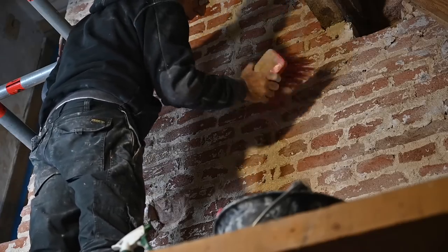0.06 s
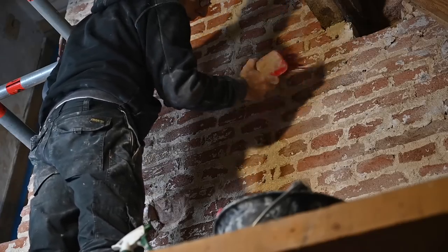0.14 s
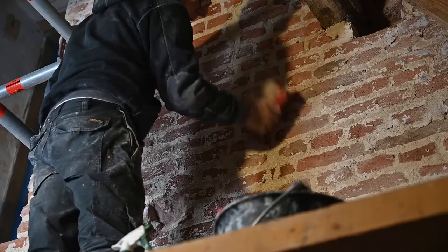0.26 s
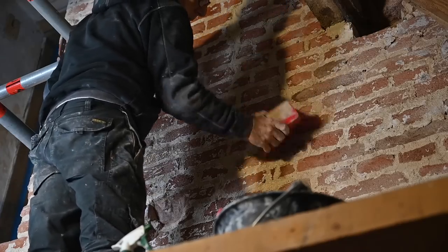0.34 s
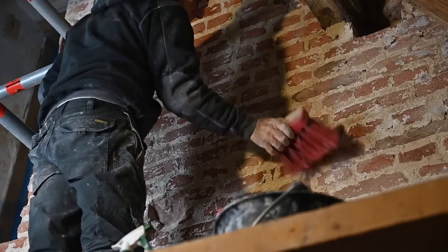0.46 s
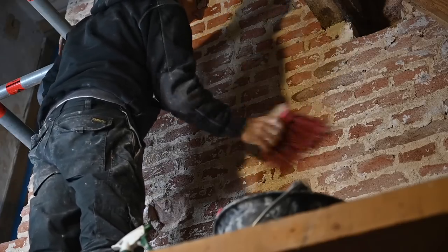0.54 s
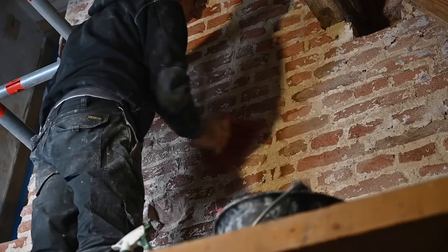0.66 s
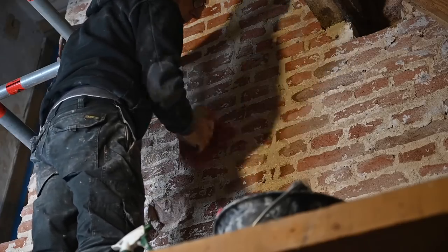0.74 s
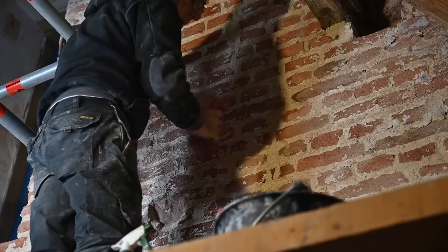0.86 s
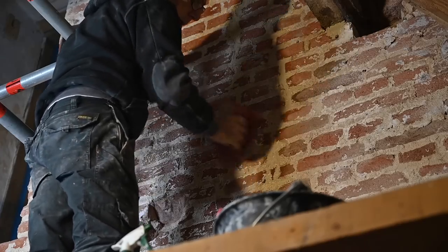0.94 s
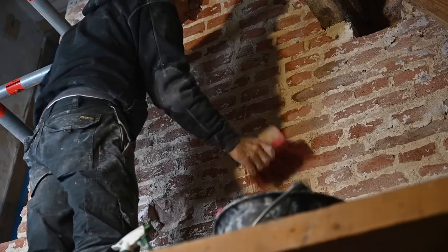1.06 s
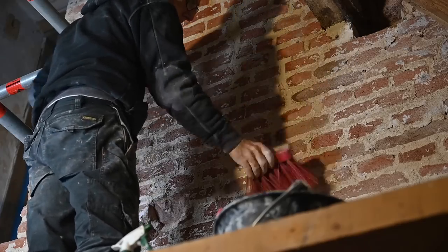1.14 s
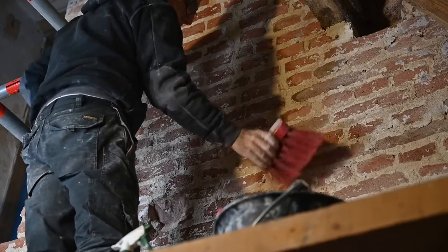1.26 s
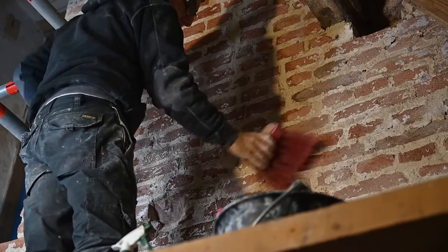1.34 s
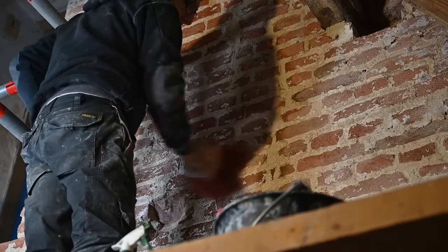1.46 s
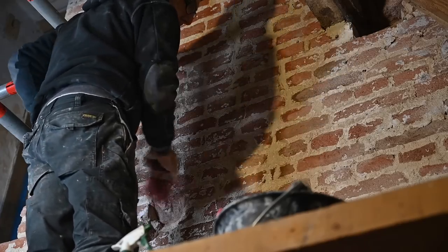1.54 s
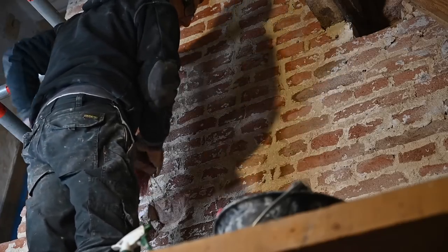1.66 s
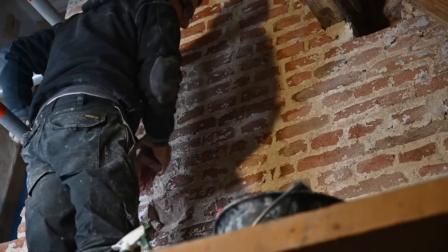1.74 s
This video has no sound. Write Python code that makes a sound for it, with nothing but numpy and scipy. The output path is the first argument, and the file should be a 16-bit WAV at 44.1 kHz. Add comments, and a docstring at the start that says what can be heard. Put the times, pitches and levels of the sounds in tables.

```python
"""Four gritty scrubs of a stiff hand brush on fresh mortar: two swell outward, two bite and fade coming back.
Thousands of bristle tips flick over the sand; the tuft pats the brick wall as it lands, and its ring
mostly sinks as it bends. Loose grit ticks and trickles between strokes, and a sleeve rustles softly.
Around it all is a quiet masonry room, heard almost in mono."""
import sys
import numpy as np
from scipy import signal
from scipy.fft import rfft, irfft, next_fast_len
from scipy.io import wavfile
from scipy.ndimage import map_coordinates

SR = 44100
rng = np.random.default_rng(int(sys.argv[2]) if len(sys.argv) > 2 else 0)


def to_wav(s):
    """Save 16-bit WAV."""
    ch = np.atleast_2d(s).T  # columns
    pcm = np.round(np.clip(ch, -1, 1) * 32767)  # PCM
    wavfile.write(sys.argv[1], SR, pcm.astype(np.int16))


N = 79380


def amp(db):
    """Decibels to gain."""
    return 10 ** (np.asarray(db) / 20)


def unit(x):
    """Scale to rms 1."""
    return x / np.sqrt(np.mean(x ** 2) + 1e-20)


def along(points, hz):
    """Read (Hz, value) points on a log frequency axis."""
    f, v = np.transpose(points)
    return np.interp(np.log(hz + 1), np.log(f + 1), v)


def clock():
    """The time of each sample in seconds."""
    return np.arange(N) / SR


def wobble(rate):
    """A smooth random curve, rate knots a second."""
    return map_coordinates(rng.standard_normal(1024), [clock() * rate], mode="wrap")


def swell(start, length):
    """A half-sine rise and fall."""
    return np.sin(np.pi * np.clip((clock() - start) / length, 0, 1))


def filtered(x, response):
    """Filter x with a gain given as a function of Hz."""
    size = next_fast_len(N + SR // 2)
    return irfft(rfft(x, size) * response(np.fft.rfftfreq(size, 1 / SR)), size)[..., :N]


def equalised(x, curve):
    """Colour x with a curve of (Hz, dB) points."""
    return filtered(x, lambda hz: amp(along(curve, hz)))


def bell(hz, centre_hz, width_oct):
    """A resonance hump of height 1."""
    return 1 / (1 + (np.log2((hz + 1) / centre_hz) / width_oct) ** 2)


def band(centre_hz, width_oct):
    """Noise of rms 1 in one resonance."""
    return unit(filtered(rng.standard_normal(N), lambda hz: bell(hz, centre_hz, width_oct)))


def room_tone():
    """A low bed of room noise, nearly the same on both sides."""
    # The room's noise colour. Each row: frequency in Hz, relative level in dB.
    colour = [(20, -30), (45, -36), (70, -16), (92, 0), (115, -5), (190, -3.5), (300, -1.5), (450, -6),
              (650, -7.5), (1000, -7.5), (1600, -17), (4000, -19.5), (15000, -26)]
    # Its stereo width. Each row: frequency in Hz, side level against the centre in dB.
    width = [(20, -16), (60, -24), (250, -27.5), (1000, -26.5), (4000, -25.5), (15000, -17)]
    mid, side = amp(-57.5) * unit(equalised(rng.standard_normal((2, N)), colour))
    side = equalised(side, width)
    return mid + np.array([side, -side])


def masonry_reverb(x):
    """The masonry answers with a short tail, treble dying first."""
    # The room's decay. Each row: frequency in Hz, seconds to fall 60 dB.
    decay = [(200, 0.71), (2000, 0.44), (6000, 0.38), (15000, 0.3)]
    hz, t, spectrum = signal.stft(rng.standard_normal(SR // 2), SR, nperseg=256)
    fade = amp(-60 * t / along(decay, hz)[:, None])
    tail = signal.istft(spectrum * fade, SR, nperseg=256)[1]
    return signal.fftconvolve(x, tail / np.linalg.norm(tail))[:N]


def arm():
    """The sleeve rustles as the arm swings, and the arm's weight thuds dully on the wall."""
    # The cloth's soft colour. Each row: frequency in Hz, relative level in dB.
    sleeve = [(60, -15), (150, -3), (300, -1), (600, -0.5), (1700, -5.5), (5000, -39), (15000, -39)]
    # Swings of the arm. Each row: start in seconds, length in seconds, level in dB.
    swings = [(0.1, 0.28, -52.5), (0.735, 0.21, -53), (1.057, 0.33, -56.5)]
    # Pushes on the wall. Each row: start in seconds, length in seconds, level in dB.
    thuds = [(0.298, 0.035, -69), (0.542, 0.074, -63), (1.035, 0.066, -72)]
    cloth = unit(equalised(rng.standard_normal(N), sleeve))
    motion = sum(amp(db) * swell(start, length) for start, length, db in swings)
    weight = sum(amp(db) * swell(start, length) for start, length, db in thuds)
    return cloth * motion + band(centre_hz=55, width_oct=0.71) * weight


def flicks(per_s, spread_db):
    """Tiny random impacts on sand, scattered in size, at an overall rms of 1."""
    # The bright colour of scraped sand. Each row: frequency in Hz, relative level in dB.
    scrape = [(100, -40), (250, -34.5), (350, -28.5), (540, -11.5), (850, -16.5), (1150, -10.5),
              (1580, -18.5), (1880, -7.5), (2500, -9.5), (3400, -4), (4800, -1), (6100, 0), (7400, -0.27),
              (9000, -4.5), (11400, -8.5), (15800, -16)]
    chance = np.clip(per_s / SR, 1e-3, 1)
    hits = (rng.random(N) < chance) * rng.choice([-1, 1], N)
    sizes = amp(spread_db * rng.standard_normal(N))
    return unit(equalised(hits * sizes / np.sqrt(chance), scrape))  # equally loud at any density


def trickle(brush):
    """Sand loosened by the brush sifts down the wall and thins out to faint dust and stray grains."""
    shed_db, dust_db, t60_s = -29, -66, 0.65
    carry = np.exp(-2 * np.log(1000) / (t60_s * SR))
    loosened = np.sqrt(np.abs(signal.lfilter([1 - carry], [1, -carry], brush ** 2)))  # lingering rms
    sand = (amp(shed_db) * loosened + amp(dust_db)) * flicks(per_s=4600, spread_db=4)
    stray_grains = amp(-69) * flicks(per_s=220, spread_db=4.5)
    return sand + stray_grains


def grit_ticks():
    """Grit and single bristles snap with a dry tick."""
    # The snaps. Each row: start in seconds, level in dB, pitch in Hz, seconds to fall 60 dB.
    snaps = [(0.1, -48, 7000, .012), (0.218, -24.5, 6000, 0.0064), (0.2228, -26, 6500, 0.01),
             (0.8216, -31.5, 5150, 0.02), (0.917, -37.5, 4100, 0.02), (0.922, -42, 5000, 0.028),
             (1.189, -45, 3800, 0.023), (1.253, -41, 6360, 0.019), (1.639, -42.5, 4700, .02)]
    rise_s = 0.00032
    out = np.zeros(N)
    for start, db, hz, t60 in snaps:
        t = clock() - start
        envelope = np.clip(t / rise_s, 0, 1) * amp(db - 60 * np.abs(t) / t60)
        out += envelope * band(hz, width_oct=0.65)
    return out


def tuft_pats():
    """The tuft meets the wall with a soft, hollow pat."""
    # The landings. Each row: start in seconds, level in dB, pitch in Hz, attack in seconds,
    # seconds to fall 60 dB.
    landings = [(.229, -39, 510, 0.0059, 0.27), (.555, -52, 660, 0.007, 0.075),
                (.928, -36, 615, 0.024, .14)]
    out = np.zeros(N)
    for start, db, hz, attack, t60 in landings:
        t = clock() - start
        envelope = np.clip(t / attack, 0, 1) * amp(db - 60 * np.maximum(t - attack, 0) / t60)
        out += envelope * band(hz, width_oct=0.7)
    return out


def bristle_rasps():
    """On coarse patches the bristles briefly chatter together."""
    # The coarse patches. Each row: start in seconds, length in seconds, level in dB, pitch in Hz.
    patches = [(0.224, 0.087, -37, 2240), (0.562, 0.012, -23, 6250), (0.635, .045, -31, 3380),
               (0.718, .045, -34, 4170), (0.983, 0.072, -40.5, 1870), (1.454, 0.046, -33.5, 3240)]
    return sum(amp(db) * swell(start, length) * band(hz, width_oct=0.12)
               for start, length, db, hz in patches)


def scrub():
    """Bristles flick over sand, denser, louder and brighter with effort; the bending tuft's ring glides."""
    # The brush strokes. Each row: start, attack, hold and release in seconds, base level in dB,
    # swell over the hold in dB, mid-stroke arch in dB, base treble tilt in dB per octave,
    # tuft pitch in Hz, its bend in octaves per second, ring strength in dB.
    strokes = [(0.213, 0.027, 0.12, 0.035, -24.5, 8, 2.5, 0.4, 7400, 1, 1.5),
               (0.548, 0.016, 0.099, 0.16, -20.5, -1.2, -0.5, 0.84, 5070, -4.5, 4),
               (0.92, .030, 0.13, 0.027, -26, 2.5, 5, 0.26, 4260, -2, 2),
               (1.355, 0.025, 0.095, 0.097, -22.5, -0.5, 1, 0.86, 5520, -6.5, 4)]
    flicks_per_s = 30000  # at an effort of 1
    brighten = 0.15  # dB per octave of tilt for each dB of effort
    ring_width_oct, hollow_ratio, hollow_depth = 0.15, 0.65, 0.85  # the hollow is a dip below the ring
    judder_db = 0.63  # unevenness of the mortar joint
    out = np.zeros(N)
    for start, attack, hold, release, db, swell_db, arch_db, base_tilt, tuft_hz, bend, ring_db in strokes:
        t = clock() - start
        progress = np.clip((t - attack) / hold, 0, 1)
        press = np.clip(t / attack, 0, 1) ** 1.65
        lift = np.clip(1 - (t - attack - hold) / release, 0, 1) ** 1.56
        effort = press * lift * amp(swell_db * (progress - 0.5) + arch_db * np.sin(np.pi * progress))
        tips = flicks(flicks_per_s * np.sqrt(effort), spread_db=4)

        hz, frame_s, spectrum = signal.stft(tips, SR, nperseg=256)
        hz = hz[:, None]
        effort_db = 20 * np.log10(np.interp(frame_s, clock(), effort) + 0.062)
        treble_oct = np.log2(np.maximum(hz, 2000) / 6000)  # pivots at 6 kHz, flat below 2 kHz
        treble_db = (base_tilt + brighten * effort_db) * treble_oct
        ring_hz = tuft_hz * 2 ** (bend * np.clip(frame_s - start, 0, attack + hold))
        ring = bell(hz, ring_hz, ring_width_oct)
        hollow = hollow_depth * bell(hz, hollow_ratio * ring_hz, ring_width_oct)
        colour_db = treble_db + ring_db * (ring - hollow - 0.2)
        bristles = signal.istft(spectrum * amp(colour_db), SR, nperseg=256)[1][:N]
        out += amp(db + judder_db * wobble(rate=90.53)) * effort * bristles
    return out


def scene():
    """Brush, grit and their short reverb in the centre, over the room tone."""
    brush = scrub() + bristle_rasps()
    direct = brush + tuft_pats() + grit_ticks() + trickle(brush) + arm()
    return direct + amp(-15.5) * masonry_reverb(direct) + room_tone()


def record(dry):
    """A steep high cut takes off the topmost air."""
    return filtered(dry, lambda hz: hz < 15820)


dry = scene()
out = record(dry)
to_wav(out)
```